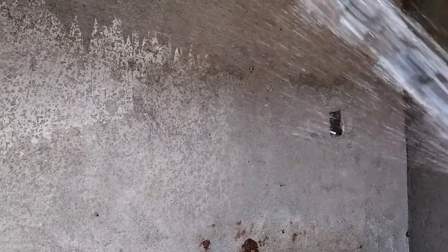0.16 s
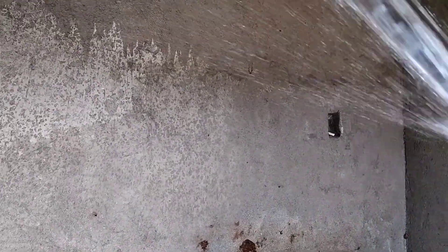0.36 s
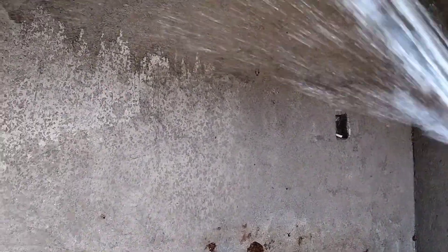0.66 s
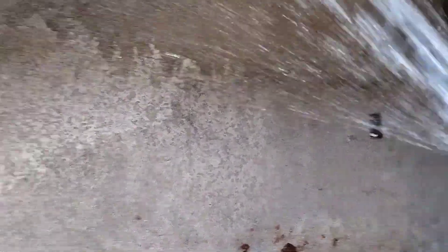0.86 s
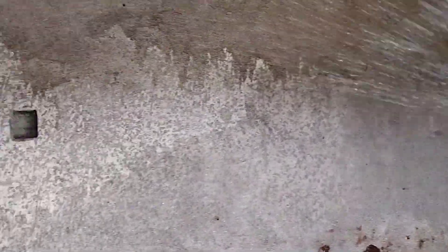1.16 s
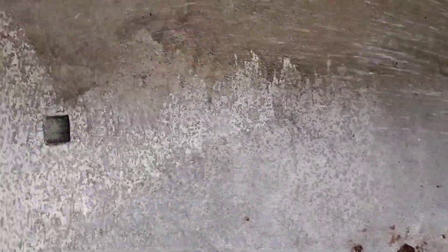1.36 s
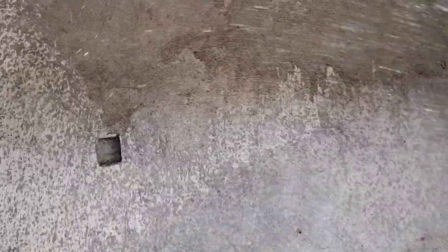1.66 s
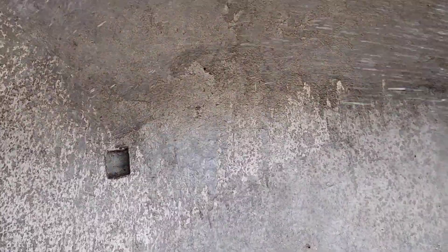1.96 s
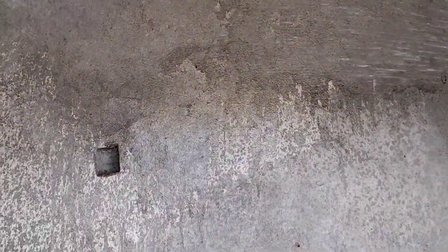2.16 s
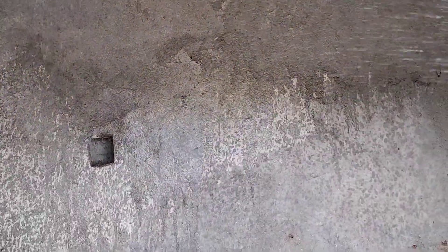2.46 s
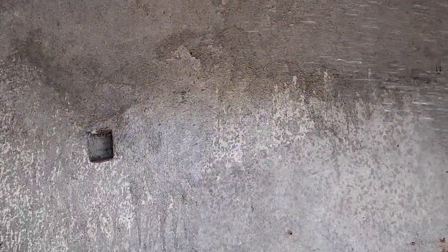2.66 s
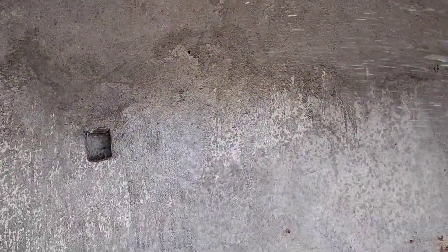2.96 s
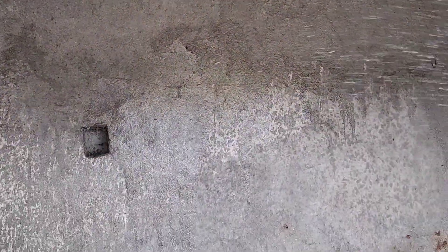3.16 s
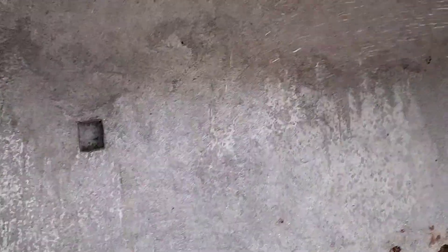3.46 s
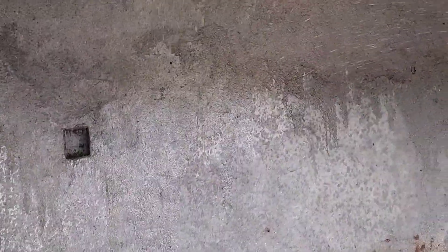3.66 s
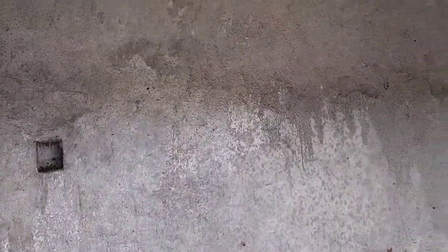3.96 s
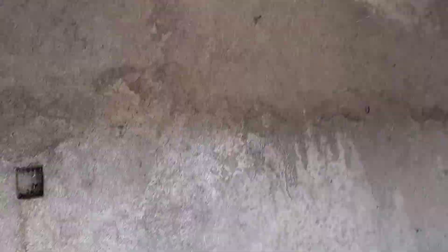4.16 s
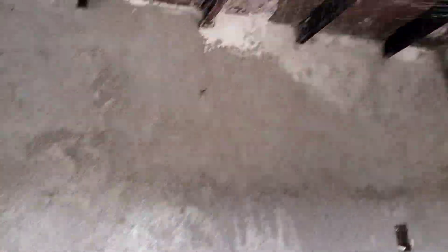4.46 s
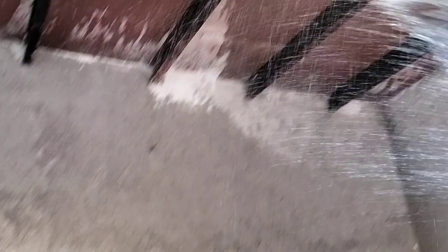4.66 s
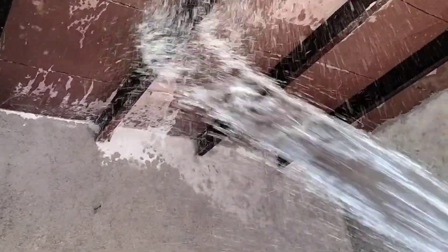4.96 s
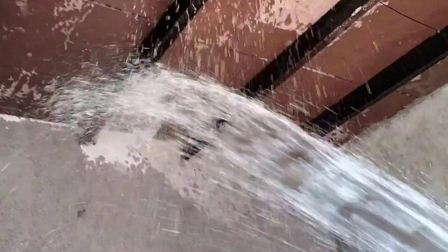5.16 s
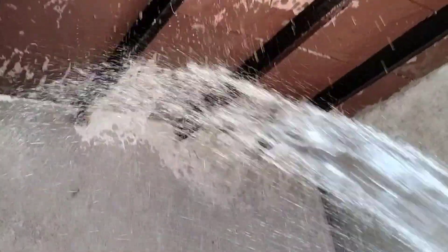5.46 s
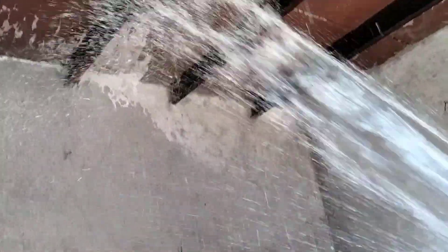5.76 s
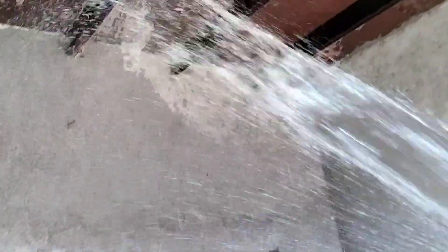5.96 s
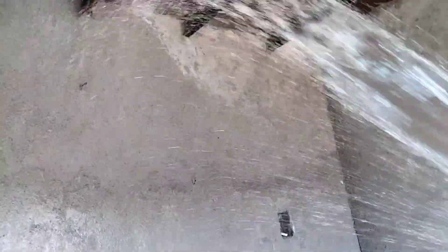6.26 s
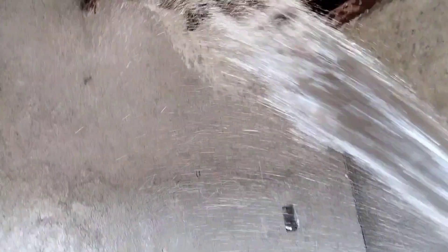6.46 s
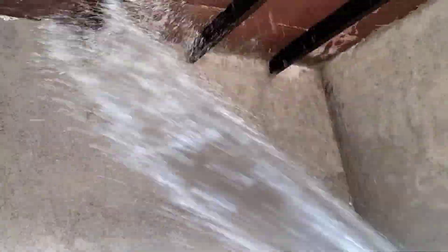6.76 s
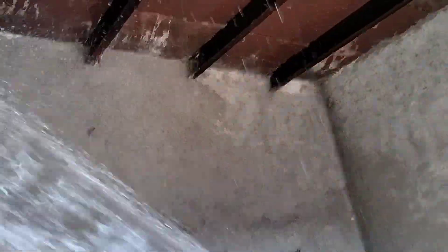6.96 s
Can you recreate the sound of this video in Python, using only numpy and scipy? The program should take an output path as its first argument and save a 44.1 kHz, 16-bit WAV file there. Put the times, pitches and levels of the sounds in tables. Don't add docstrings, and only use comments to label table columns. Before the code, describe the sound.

Pressurised water sprays over concrete and rafters, its bright hiss swelling and dipping amid wet slaps, dull thuds and sharp close drips.

```python
import sys
import numpy as np
from scipy import signal
from scipy.fft import rfft, irfft, next_fast_len
from scipy.io import wavfile
from scipy.ndimage import uniform_filter1d, minimum_filter1d

SR = 44100
rng = np.random.default_rng(int(sys.argv[2]) if len(sys.argv) > 2 else 0)


def to_wav(s):
    ch = np.atleast_2d(s).T
    pcm = np.round(np.clip(ch, -1, 1) * 32767)
    wavfile.write(sys.argv[1], SR, pcm.astype(np.int16))


def gain_from_db(level_db):
    decades = np.asarray(level_db, float) / 20
    return 10 ** decades


N = 313110


def evened(x):
    return x / np.sqrt(np.mean(x ** 2) + 1e-20)


def read(points, hz):
    f, value = np.transpose(points)
    return np.interp(np.log(hz + 1), np.log(f + 1), value)


def add(mix, s, sound):
    part = mix[round(s * SR):][:len(sound)]
    part += sound[:len(part)]


def humps(rows):
    t = np.arange(0, N, 64) / SR
    out = np.zeros(len(t))
    for s, height, half_s in rows:
        out += height * np.exp(-((t - s) / half_s) ** 2)
    return np.interp(np.arange(N) / SR, t, out)


def coloured(x, points):
    level_db = np.maximum(read(points, abs(np.fft.fftfreq(8192, 1 / SR))), -100)
    log_gain = level_db * np.log(10) / 20
    taps = np.fft.ifft(np.exp(np.conj(signal.hilbert(log_gain)))).real[:4096]
    return signal.oaconvolve(x, taps[None], axes=1)[:, :N]


# frequency_hz, level_db
RUMBLE = [(15, -50), (25, -17), (59, -10.5), (92, 0.5), (135, -8), (170, 4), (220, -23), (370, -120)]


def rumble():
    return gain_from_db(-61) * evened(coloured(rng.standard_normal((2, N)), RUMBLE))


# frequency_hz, t60_s
ROOM = [(200, 0.51), (1000, 0.81), (4000, 0.16), (12000, 0.039)]


def room(x, wet_db):
    hz, t, z = signal.stft(rng.standard_normal((2, SR // 2)), SR, nperseg=256)
    t60 = np.maximum(read(ROOM, hz), .05)
    tail = signal.istft(z * gain_from_db(-60 * t / t60[:, None]), SR, nperseg=256)[1]
    tail[:, :130] = 0
    return x + gain_from_db(wet_db) * signal.oaconvolve(x, tail / np.linalg.norm(tail[0]), axes=1)[:, :N]


# middle_s, peak_db, half_length_s
PUFFS = [
    (1.066, -50.5, 0.028),
    (1.124, -58, 0.027),
    (1.192, -59, .025),
    (1.26, -62, .035),
    (1.53, -38, 0.052),
    (1.603, -50.5, .03),
    (3.526, -64, .04),
    (3.592, -58, .03),
    (3.945, -74, 0.03),
]
# frequency_hz, level_db
PUFF = [(12, -49), (20, -19), (97, 0.5), (152, -5), (216, -15.5), (257, -50), (320, -14), (420, -66),
        (700, -120)]


def puffs():
    level = humps([(s, gain_from_db(db), half_s) for s, db, half_s in PUFFS])
    air = evened(coloured(rng.standard_normal((1, N)), PUFF))[0]
    return air * level * gain_from_db(11.5) * np.array([[.03], [1]])


def bursts(rows, knock_db, cycles, t60, width):
    out = np.zeros((2, N))
    t = np.arange(SR // 3) / SR
    wide = 1 + width
    for s, db, hz in rows:
        band = signal.butter(2, [hz / wide, hz * wide], "bandpass", fs=SR, output="sos")
        knock = signal.sosfilt(band, np.sin(2 * np.pi * hz * t) * np.exp(-t * hz / cycles))
        knock *= gain_from_db(knock_db) / abs(knock).max()
        foam = evened(signal.sosfilt(band, rng.standard_normal((2, len(t))))) * gain_from_db(-60 * t / t60)
        foam *= 0.35 * np.minimum(t / 0.0015, 1)
        for side, side_foam in zip(out, foam):
            add(side, s, gain_from_db(db) * (knock + side_foam))
    return out


# start_s, peak_db, centre_hz
THUDS = [
    (0.056, -19, 510),
    (0.059, -18, 292),
    (0.389, -33, 525),
    (0.896, -27.5, 338),
    (2.096, -31, 376),
    (2.684, -21.5, 435),
    (2.863, -22, 416),
    (3.59, -21, 374),
    (3.793, -25, 275),
    (6.317, -25, 330),
]


def thuds():
    return bursts(THUDS, knock_db=-4.0, cycles=1.86, t60=0.11, width=0.5)


# start_s, peak_db, centre_hz
BLOOPS = [
    (1.901, -20, 860),
    (6.851, -20, 1060),
]


def bloops():
    return bursts(BLOOPS, knock_db=-11.0, cycles=0.77, t60=0.4, width=0.22)


# start_s, peak_db, centre_hz
SLAPS = [(0.28, -19.5, 1510), (0.814, -23.5, 2050), (1.048, -33, 2360), (1.453, -13.5, 1540),
         (1.59, -17, 1310), (2.613, -12, 2370), (3.979, -23.5, 1230), (4.086, -17.5, 2100),
         (4.268, -22, 1880), (4.62, -20, 1140), (4.76, -9.5, 2300), (5.252, -15, 1430), (5.635, -13, 1440),
         (6.014, -14, 1440), (6.14, -12, 2440), (6.85, -10, 1570)]


def slaps():
    return bursts(SLAPS, knock_db=-5.5, cycles=0.5, t60=0.19, width=0.25)


# start_s, peak_db
TICKS = [(0.0209, -12), (0.9128, -15), (1.0455, -14), (1.4321, -11), (1.5569, -6), (1.6706, -13),
         (2.2942, -12), (3.1627, -9), (3.241, -8), (3.6765, -13), (3.8342, -11), (4.8988, -7), (5.7289, -6),
         (5.7334, -7), (5.7434, -5), (5.7574, -9), (5.9753, -10), (6.1384, -10), (6.2662, -9), (6.3934, -8),
         (6.8553, -6), (7.0369, -8)]


def ticks():
    click = coloured(signal.unit_impulse((1, 600), (0, 0)), SPRAY)[0]
    click /= abs(click).max()
    out = np.zeros((2, N))
    pans_db = 3.4 + 1.2 * rng.standard_normal(len(TICKS))
    for (s, db), pan_db in zip(TICKS, pans_db):
        for side, way in zip(out, (.5, -.5)):
            add(side, s, -gain_from_db(db - .5 + way * pan_db) * click)
    return out


def drops(per_s, spread_db, blur, surge_db):
    lot, fine = rng.random((2, N)), rng.standard_normal((2, N))
    chance = per_s / SR
    rarity = np.minimum(np.log(chance / (lot + 1e-12)), 4.2)
    size = gain_from_db(spread_db * rarity) * (lot < chance)
    rain = np.sqrt(1 - blur) * evened(size * np.sign(fine)) + np.sqrt(blur) * fine
    surge = signal.lfilter([1], [1, -np.exp(-1 / (0.055 * SR))], rng.random(N) < 60 / SR)
    return rain * gain_from_db(surge_db * evened(surge - surge.mean()))


def layer(rain, points, level_db, patchy_db):
    hz, t, z = signal.stft(coloured(rain, points), SR, nperseg=512)
    patches = rng.standard_normal(z.shape[:0:-1]).T
    patches = uniform_filter1d(patches, size=6, axis=0)
    patches = evened(uniform_filter1d(patches, size=10, axis=1))
    x = signal.istft(z * gain_from_db(patchy_db * patches), SR, nperseg=512)[1][:, :N]
    return evened(x) * gain_from_db(level_db)


# frequency_hz, level_db
DRUM = [(88, -38.5), (150, -13.5), (210, -7), (280, 1), (329, -1.5), (400, 0), (434, 0), (507, -1.5),
        (700, -2.5), (910, -21), (1540, -120)]


def drum(drum_db):
    rain = drops(per_s=300, spread_db=5.5, blur=0.71, surge_db=0.7)
    return layer(rain, DRUM, drum_db + 0.53, patchy_db=1.5)


# frequency_hz, level_db
SPLASH = [(380, -33), (650, -8), (910, -4.5), (1070, -3), (1250, -7), (1620, -12.5), (2750, -120)]


def splash(splash_db):
    rain = drops(per_s=570, spread_db=1.5, blur=0.47, surge_db=2.15)
    return layer(rain, SPLASH, splash_db + 3.5, patchy_db=0.1)


# frequency_hz, level_db
FROTH = [(740, -33), (1250, 3.5), (1750, 5), (1960, -1), (2100, -2.5), (2730, -4), (4620, -120)]


def froth(froth_db):
    rain = drops(per_s=1200, spread_db=2.0, blur=0.69, surge_db=2.5)
    return layer(rain, FROTH, froth_db + 3.5, patchy_db=1.5)


# frequency_hz, level_db
MIST = [(6000, -40), (9000, -9), (9500, -11), (10100, -4.5), (10900, -5), (11900, 1), (12700, -4.5),
        (14700, -1.5), (15600, -8), (16500, -30)]


def mist(mist_db):
    rain = drops(per_s=3700, spread_db=0.5, blur=0.91, surge_db=0.0)
    return layer(rain, MIST, mist_db, patchy_db=1.0)


# frequency_hz, level_db
SPRAY = [(1120, -43), (1900, -13.5), (2560, -1), (3000, -2.5), (3930, 0.5), (4560, -5.5), (5850, -6.5),
         (6560, -16.5), (8360, -31.5), (9500, -44), (12400, -80), (20900, -120)]


def spray(spray_db):
    rain = drops(per_s=3100, spread_db=7.5, blur=0.77, surge_db=0.6)
    return layer(rain, SPRAY, spray_db + 2.5, patchy_db=1.0)


# time_s, spray_db
JET = [(0, -25.5), (.28, -29.5), (.66, -38.5), (.79, -39.5), (1.07, -24), (1.56, -24), (1.8, -27.5),
       (2.3, -26.5), (3.0, -26), (3.26, -20.5), (3.58, -25.5), (3.85, -24), (4.15, -29), (4.45, -27.5),
       (4.94, -17.5), (5.4, -24), (6.35, -19), (7.1, -23)]
# time_s, amount_db, aim (0 hollow foot of the wall, 1 hard rafters)
HEAVY = [(0, -34.5, 0.7), (.3, -43, -0.24), (.7, -53, -0.13), (1.25, -43, 0.047), (1.4, -38, 0.32),
         (1.75, -44.5, -0.45), (2.8, -42, 0.067), (3.06, -37.5, -0.49), (3.3, -38, -0.21),
         (3.85, -41, -0.73), (4.2, -43, 0.23), (4.65, -33, 0.96), (5.0, -34, 1), (5.4, -38, 0.42),
         (5.63, -36, 0.3), (6.2, -38, 0.34), (6.65, -34, 0.23), (7.1, -39.5, 0.55)]
# middle_s, change_db, half_length_s
WAVERS = [(.04, 3.5, 0.034), (.14, 1.5, 0.016), (.43, -3, 0.036), (.94, 2, 0.06), (1.02, -1.5, 0.039),
          (1.22, -3.5, 0.065), (1.66, 1.5, 0.21), (1.8, -3, 0.053), (2.0, 2.5, 0.014), (2.16, -5.5, 0.06),
          (2.31, 4, 0.15), (2.43, -3.5, .06), (2.63, 2, 0.026), (2.73, 2, 0.056), (2.89, 2.5, .05),
          (3.0, -0.5, 0.09), (4.13, -1.5, .04), (4.27, 1, .03), (4.31, -3.5, 0.023), (4.57, 2.5, 0.068),
          (5.06, -2.5, 0.045), (5.34, -2, 0.028), (5.46, -0.5, 0.022), (5.72, 3, 0.038), (5.85, -3, 0.095),
          (6.1, -2.5, 0.19), (6.36, 1, .03), (6.68, -3, 0.18), (6.82, -2.5, 0.053), (6.9, 5, 0.23)]
# start_s, jump_db
GUSHES = [(.021, 4), (.913, 11), (1.045, 5), (1.557, 7), (1.927, 5), (2.177, 8), (2.294, 4), (3.241, 3),
          (3.576, 5), (3.834, 5), (5.299, 4), (5.728, 4), (5.975, 6), (6.138, 5), (6.301, 4), (6.393, 5),
          (6.851, 4)]


def jet():
    t = np.arange(N) / SR
    waver_db = humps(WAVERS)
    spray_db = np.interp(t, *np.transpose(JET)) + waver_db
    s, *columns = np.transpose(HEAVY)
    heavy_db, aim = (np.interp(t, s, c) for c in columns)
    froth_db = -10.5 + 0.75 * spray_db + 0.31 * heavy_db + 3.5 * aim
    splash_db = heavy_db + 0.32 * waver_db
    drum_db = splash_db - 8.5 * aim
    step_db = np.zeros(N)
    for at, jump_db in GUSHES:
        step_db += jump_db / 2 * np.tanh((t - at) / .0008) * np.exp(-abs(t - at) / .03)
    mist_db = -34.5 + 0.8 * spray_db + 0.2 * step_db
    fine = spray(spray_db + step_db) + mist(mist_db)
    return fine + froth(froth_db + 1.3 * step_db) + splash(splash_db) + drum(drum_db)


# frequency_hz, likeness (0-1)
SAME = [(60, 0.9), (130, 0.91), (290, 0.93), (640, 0.61), (1410, 0), (3100, -0.0), (6820, 0.0085),
        (15000, 0)]
# frequency_hz, difference_db
LEFT_DB = [(60, 0.0), (92, -0.5), (140, 4), (210, 2), (330, 2.5), (500, 2), (770, 1.0), (1170, 1.5),
           (1790, 2), (2740, 4), (4190, 4.0), (6410, -1), (9810, 13.5), (15000, 2.5)]


def ports(x):
    size = next_fast_len(N)
    hz = np.fft.rfftfreq(size, 1 / SR)
    left, other = rfft(x, size)
    same, tilt_db = read(SAME, hz), read(LEFT_DB, hz) / 2
    right = same * left + np.sqrt(1 - same ** 2) * other
    return irfft(np.array([left * gain_from_db(tilt_db), right * gain_from_db(-tilt_db)]), size)[:, :N]


def scene():
    slugs = slaps() + bloops() + thuds()
    water = ports(jet() + room(slugs, wet_db=-8.0) + rumble())
    return water + room(ticks(), wet_db=-3.0) + puffs()


def limiter(x):
    over = np.maximum(abs(x).max(axis=0) / .92, 1)
    return x * uniform_filter1d(minimum_filter1d(1 / over, size=257), size=129)


def sparse_treble(x, under_db, wobble_db):
    window = np.sqrt(signal.windows.hann(2048, sym=False))
    hz, t, z = signal.stft(x, SR, window, nperseg=2048)
    power = uniform_filter1d(abs(z) ** 2, size=3, axis=1)
    usual = power[:, (hz > 10000) & (hz < 15000)].mean(axis=1, keepdims=True)
    wobble = np.repeat(rng.standard_normal((len(t), 129, 2)).T, 8, axis=1)[:, :len(hz)]
    threshold = usual * gain_from_db(2 * (under_db + wobble_db * wobble))
    faint = (power < threshold) & (hz > 6000)[:, None]
    return signal.istft(z * ~faint, SR, window, nperseg=2048)[1][:, :N]


def low_pass(x):
    return signal.sosfilt(signal.butter(12, 15750, fs=SR, output="sos"), x)


def record(dry):
    finished = sparse_treble(limiter(dry), under_db=2.2, wobble_db=2.2)
    return low_pass(finished)


dry = scene()
out = record(dry)
to_wav(out)
```